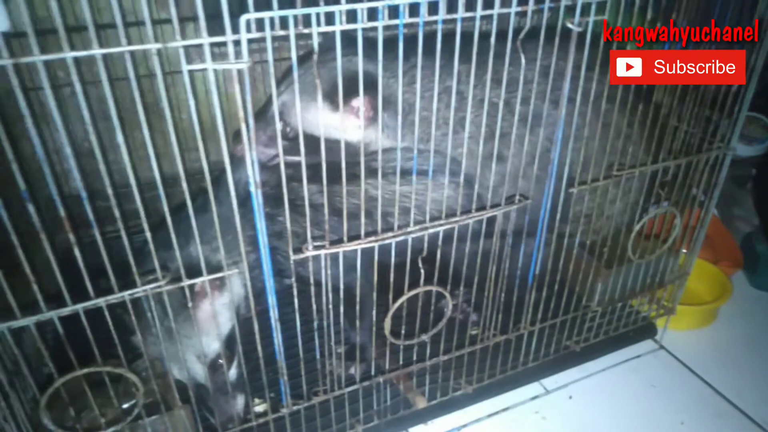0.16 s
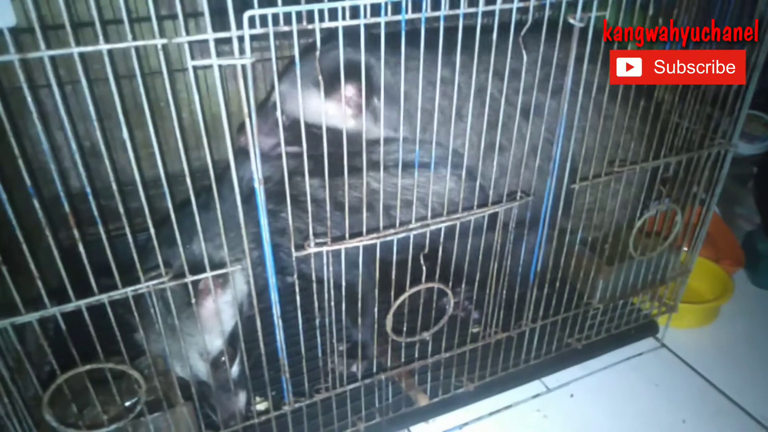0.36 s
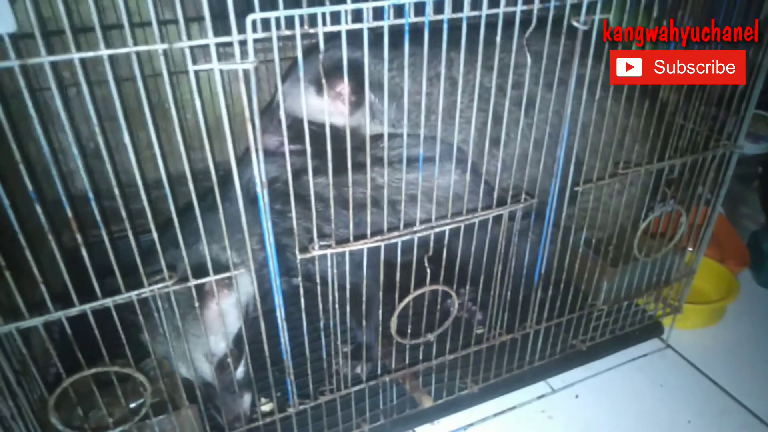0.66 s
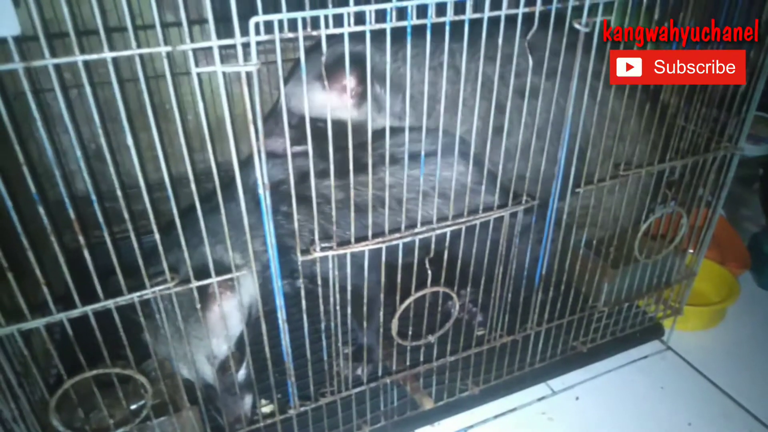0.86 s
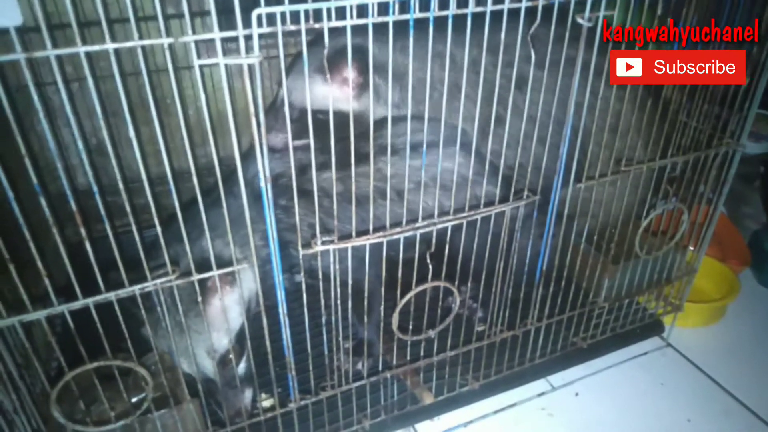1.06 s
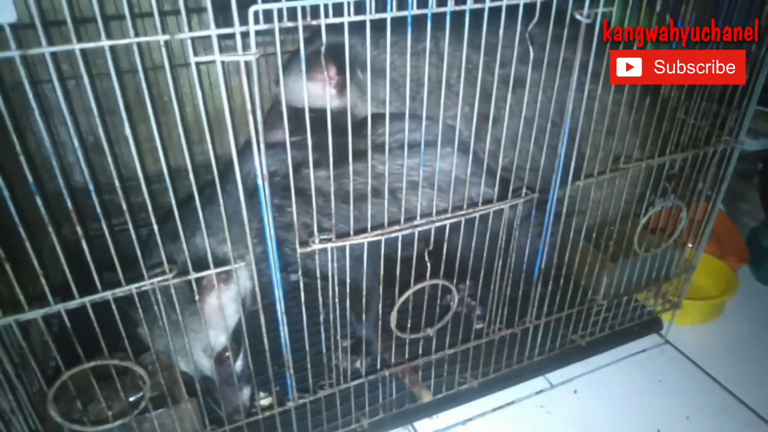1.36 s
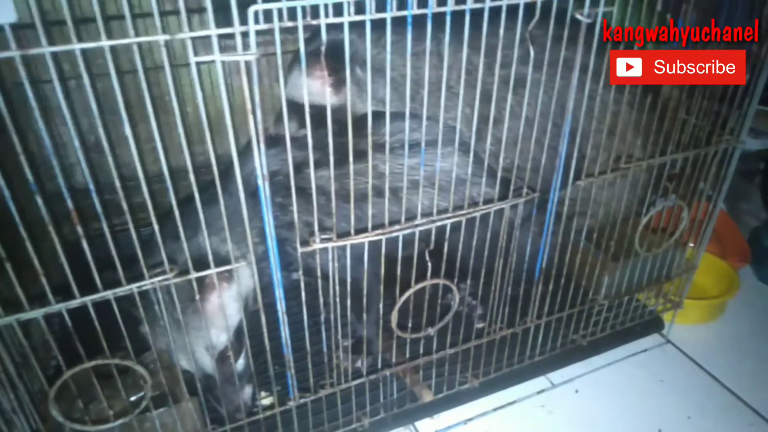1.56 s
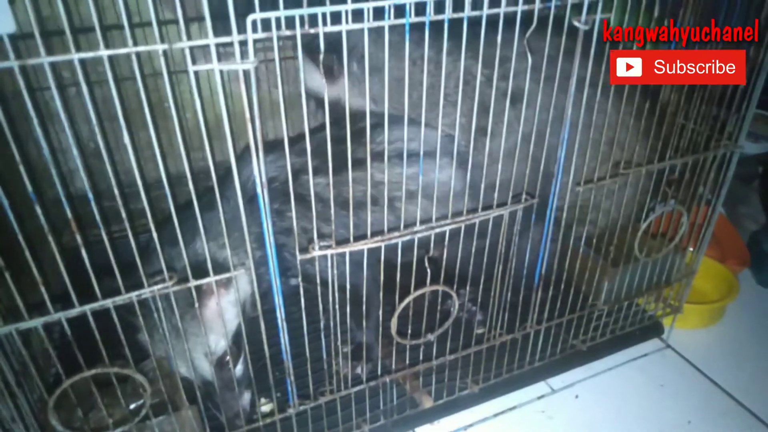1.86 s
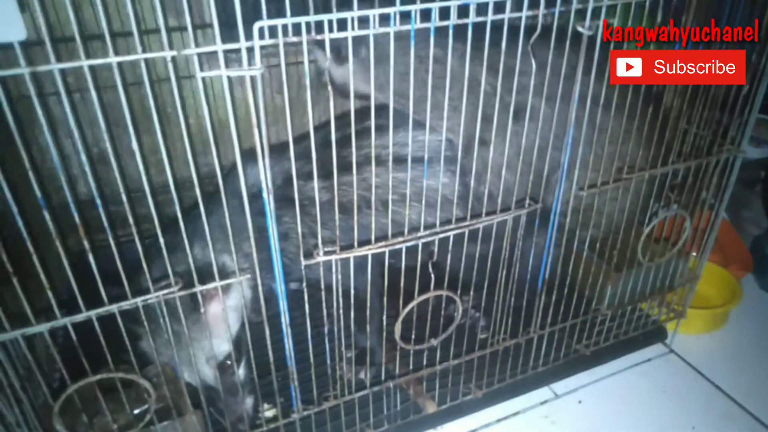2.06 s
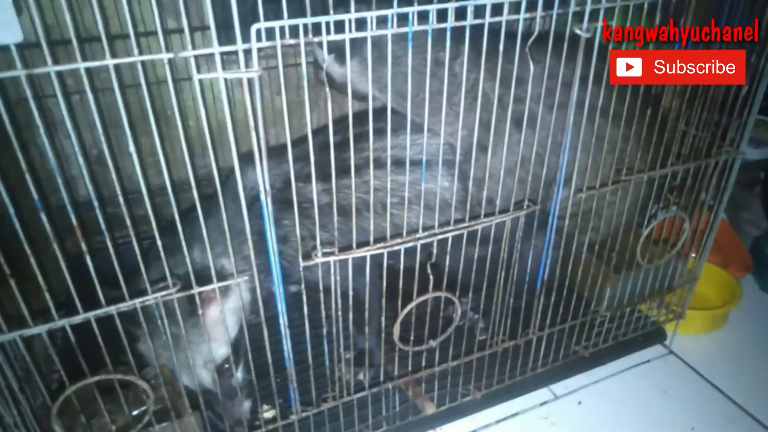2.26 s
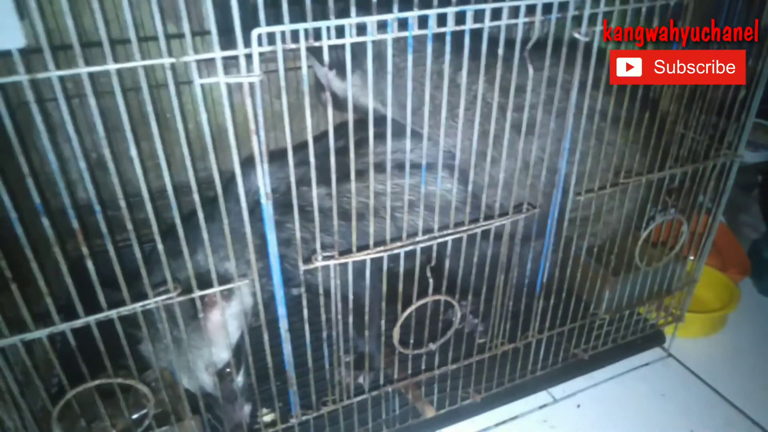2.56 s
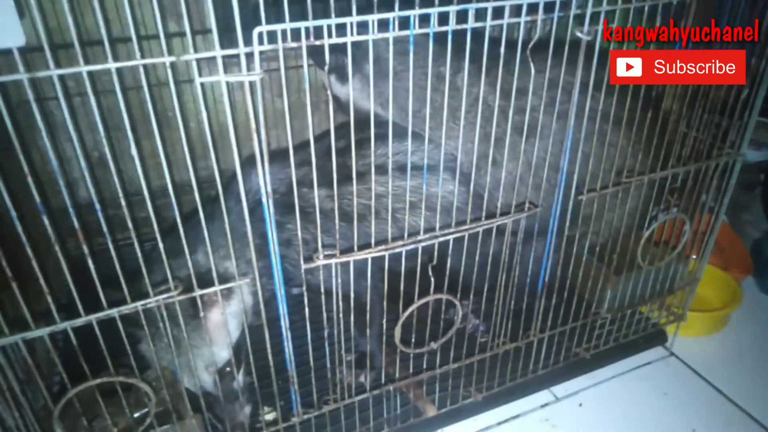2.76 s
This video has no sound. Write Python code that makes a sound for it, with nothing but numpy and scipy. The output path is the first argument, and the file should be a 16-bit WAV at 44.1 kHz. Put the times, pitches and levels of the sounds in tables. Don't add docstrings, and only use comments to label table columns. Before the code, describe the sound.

One long, shrill, whining animal call, opening with a quick yelp and wavering slightly, falls off into a tiny nasal sigh; short reflections from hard walls, quiet night air, low hum and distant insects.

```python
import sys
import numpy as np
from scipy import signal
from scipy.fft import rfft, irfft
from scipy.io import wavfile
from scipy.ndimage import uniform_filter1d

SR = 44100
rng = np.random.default_rng(int(sys.argv[2]) if len(sys.argv) > 2 else 0)


def boost_factor(decibels):
    exponent = np.asarray(decibels, float) / 20
    return 10 ** exponent


def generate_wav(sig):
    pcm = np.round(np.clip(np.atleast_2d(sig).T, -1, 1) * 32767).astype(np.int16)
    wavfile.write(sys.argv[1], SR, pcm)


N = 127890
TIME_S = np.arange(N) / SR


def evened(x):
    return x / np.sqrt(np.mean(x ** 2) + 1e-20)


def read(points, where):
    position, value = np.transpose(points)
    return np.interp(np.log(where + 0.0012), np.log(position), value)


def coloured(gain):
    spectrum = rfft(rng.standard_normal(N))
    return evened(irfft(spectrum * gain(np.fft.rfftfreq(N, 1 / SR)), N))


def peak(hz, width_hz):
    return lambda f: 1 / (1 + ((f - hz) / width_hz * 2) ** 2)


def bump(t, top_s, rise_s, fall_s):
    return np.exp(-((t - top_s) / np.where(t < top_s, rise_s, fall_s)) ** 2)


def insects():
    throb_hz, throb_top_s, throb_depth_db = 7.22, 0.055, 11
    swell = (np.cos(2 * np.pi * throb_hz * (TIME_S - throb_top_s)) - 1) / 2
    throb_db = throb_depth_db * swell + 1.2 * coloured(peak(0, 40))
    return boost_factor(-66 + throb_db) * coloured(peak(6600, 650))


# (pitch_hz, level_db)
AIR_COLOUR = [(25, -13), (50, -8.5), (110, -7.5), (330, -13), (1000, -7.5), (2200, -12.5), (5200, -32),
              (15000, -23.5)]


def still_air():
    return boost_factor(-65.5) * coloured(lambda f: boost_factor(read(AIR_COLOUR, f)) * (f > 20))


# (pitch_hz, level_db)
HUMS = [(51, -72), (100, -81), (187, -79)]


def hum():
    return sum(boost_factor(level_db) * coloured(peak(hz, 32)) for hz, level_db in HUMS)


# (time_s, pitch_hz, effort_db, mouth_open_0_to_1)
WAIL_LINE = [(0.052, 790, -44.5, 0), (0.081, 692, -43, 0.78), (0.128, 747, -49.5, 0.06),
             (0.216, 735.5, -32.5, 0), (0.301, 765, -31.5, 0.16), (.375, 737.3, -30.5, 0.43),
             (0.492, 780, -26.5, 1), (0.588, 794, -26.5, 0.94), (.68, 773.8, -24.5, 1),
             (0.842, 789, -24, 1), (1.139, 790.7, -24.5, 0.88), (1.31, 814.5, -27.5, 0.97),
             (1.601, 780.6, -24, 1), (1.968, 781.6, -24, 1), (2.299, 783.4, -23.5, 0.84),
             (2.499, 760.5, -25, 0.81), (2.6, 733.2, -23, 0.62), (2.625, 642, -34, 0.6)]
# (top_s, rise_hz, rise_s, fall_s, level_db)
CHEST_CATCHES = [
    (0.177, 74.5, 0.024, 0.032, -0.5),
    (0.437, 161.5, .03, 0.03, 2.5),
    (.75, 34.5, 0.032, .05, -3.5),
    (0.929, 8, 0.1, .02, 1.5),
    (1.029, 19, 0.017, 0.037, -2.5),
    (1.204, 32.5, .025, 0.016, -4),
    (1.987, -13.5, 0.005, 0.012, 0),
    (2.072, 17, .04, 0.051, 1.5),
    (2.162, 29.5, 0.056, 0.046, -2.5),
    (2.547, -3.5, 0.014, 0.017, -4),
]
# (time_s, length_s, level_db)
LOWEST_PARTIAL_DIPS = [
    (.38, .015, -18),
    (.705, .015, -14),
    (1.215, .025, -16),
    (1.7, .1, -4),
    (1.89, .04, -6),
    (2.0, .02, -14),
    (2.43, .03, -15),
]


def voice_line():
    times_s, *rows = np.transpose(WAIL_LINE)
    hz, effort_db, mouth = (uniform_filter1d(np.interp(TIME_S, times_s, row), size=600) for row in rows)
    for top_s, rise_hz, rise_s, fall_s, level_db in CHEST_CATCHES:
        shape = bump(TIME_S, top_s, rise_s, fall_s)
        hz = hz + rise_hz * shape
        effort_db = effort_db + level_db * shape
    return hz, effort_db, np.clip(mouth, 0, 1)


# (partial_number, level_db)
MOUTH_SHUT = [(1, -23.5), (2, 0), (3, -8.5), (4, -21), (5, -29), (6, -31.5), (7, -46.5), (8, -43), (9, -19),
              (10, -24.5), (11, -53.5), (12, -51.5), (13, -60), (14, -67.5), (15, -57), (16, -55),
              (17, -52.5), (18, -46.5), (19, -49.5), (20, -43)]
# (partial_number, level_db)
MOUTH_OPEN = [(1, -25.5), (2, -15), (3, 0), (4, -18.5), (5, -45.5), (6, -49), (7, -43), (8, -37.5),
              (9, -28), (10, -43.5), (11, -42.5),
              (12, -62), (13, -68), (14, -69), (15, -65), (16, -70), (17, -68), (18, -50), (19, -51),
                  (20, -60)]
# (partial_number, level_db per 30 Hz of pitch)
STRAIN_COLOUR = [(1, 9.5), (3, 1), (4, 1.5), (5, 30.5), (6, 27.5), (7, 6.5), (9, 8.5), (11, 9.5), (13, 2.5),
                 (17, 8.5)]
# (partial_number, level_db)
SOFT_COLOUR = [(1, 10), (2, -0.5), (3, -4), (4, -8.5), (5, -7), (9, -15), (20, -14)]
# (partial_number, level_db)
CLOSING_COLOUR = [(1, -5.5), (2, -15), (3, -3.5), (4, -16.5), (6, -6), (9, -2), (20, -9.5)]
# (partial_number, level_db)
YELP_COLOUR = [(1, 6), (2, -5), (3, -3), (4, 3), (6, -1), (12, -4)]


def partials(hz, mouth, shaken):
    strain = mouth ** 6 * np.clip((hz - 789.7) / 30, 0, 1)
    soft = np.clip((0.19 - TIME_S) / 0.013, 0, 1)
    closing = np.interp(TIME_S, [2.44, 2.6], [0, 1])
    dip_db = sum(db * bump(TIME_S, top_s, length_s, length_s) for top_s, length_s, db in LOWEST_PARTIAL_DIPS)

    wander = 0.0024 * coloured(peak(0, 34))
    jitter = (0.001 + 0.009 * shaken) * coloured(peak(0, 200))
    hz = hz * (1 + wander + jitter)
    yelp = np.clip((hz - 800) / 70, 0, 1)
    turn = 2 * np.pi * np.cumsum(hz) / SR

    follow = 0.7
    shut_shift = (hz / 781) ** (1 - follow)
    open_shift = (hz / 780) ** (1 - follow)
    tone = np.zeros(N)
    for k in range(1, 21):
        level_db = (1 - mouth) * read(MOUTH_SHUT, k * shut_shift)
        level_db += mouth * read(MOUTH_OPEN, k * open_shift)
        level_db += read(STRAIN_COLOUR, k) * strain + read(YELP_COLOUR, k) * yelp
        level_db += read(SOFT_COLOUR, k) * soft + read(CLOSING_COLOUR, k) * closing
        level_db += (k == 1) * dip_db
        shimmer_db = 0.72 + 2.2 * (1 - mouth) + 2.1 * (k >= 4)
        level_db += shimmer_db * coloured(peak(0, 22))
        level_db += 5 * shaken * coloured(peak(0, 96))
        wave = np.cos(k * turn + 2 * np.pi * rng.random())
        tone += np.sqrt(2) * boost_factor(level_db) * wave * (k * hz < 15700)
    return tone


# (pitch_hz, width_hz, level_db)
BREATH_BANDS = [(2083, 350, -36.5), (7450, 3100, -40.5), (14400, 3200, -58), (1100, 940, -56),
                (4970, 6000, -54), (10800, 1200, -70)]


def breath():
    air = np.zeros(N)
    for hz, width_hz, level_db in BREATH_BANDS:
        band = coloured(lambda f: peak(hz, width_hz)(f) ** 2)
        air += boost_factor(level_db + 2.5 * coloured(peak(0, 30))) * band
    return air


def wail():
    start_s, attack_s, release_s = 0.051, 0.0045, 0.013
    hz, effort_db, mouth = voice_line()
    glide_hz_per_s = uniform_filter1d(abs(np.gradient(hz)) * SR, size=1300)
    shaken = np.clip(glide_hz_per_s / 4600, 0, 1) ** 3
    voice = partials(hz, mouth, shaken) + breath() * boost_factor(7 * shaken)
    fade_in = np.clip((TIME_S - start_s) / attack_s, 0, 1)
    fade_out = np.clip((WAIL_LINE[-1][0] + release_s - TIME_S) / release_s, 0, 1)
    crack = boost_factor(-57) * bump(TIME_S, start_s + 0.0018, 0.0054, 0.007) * coloured(peak(1300, 1400))
    return fade_in * fade_out * boost_factor(effort_db) * voice + crack


# (pitch_hz, level_db)
HISS_COLOUR = [(2500, -22), (3500, 0), (6000, -1), (8500, -5), (10500, -13), (15000, -14)]


def hiss():
    air = coloured(lambda f: boost_factor(read(HISS_COLOUR, f)) * (f > 2000))
    return boost_factor(-55) * bump(TIME_S, 0.93, 0.01, 0.032) * air


def sigh():
    start_s, length_s, pitch_hz, fade_db_per_s = 2.608, 0.115, 665, -150
    t = TIME_S - start_s
    gate = np.clip(t / 0.012, 0, 1) * np.clip((length_s - t) / 0.02, 0, 1)
    hz = pitch_hz * (1 + 0.03 * np.exp(-abs(t) / 0.03) * coloured(peak(0, 120)))
    level_db = -45 + fade_db_per_s * np.maximum(t, 0) + 2 * coloured(peak(0, 66))
    return gate * boost_factor(level_db) * np.sin(2 * np.pi * np.cumsum(hz) / SR)


def peep():
    return boost_factor(-68.5) * bump(TIME_S, 2.8, 0.03, 0.03) * np.sin(2 * np.pi * 1152 * TIME_S)


# (pitch_hz, decay_s)
WALL_DECAY = [(500, .2), (1500, .25), (3000, .26), (7000, .11), (14000, .08)]
# (pitch_hz, level_db)
WALL_TINT = [(600, -11), (1600, -2.5), (2300, -8), (3500, 3), (8000, 3)]
# (delay_s, level_db)
FIRST_ECHOES = [(.0021, -16), (.0047, -20.5), (.0083, -18.5), (.0126, -31), (.019, -15.5), (.057, -30.5)]


def walls(x):
    taps = np.zeros(SR // 2)
    at = np.arange(400, len(taps) - 20, 20)
    taps[at + rng.integers(0, 20, len(at))] = rng.choice([-1., 1.], len(at))
    hz, t, bands = signal.stft(taps, SR, nperseg=256)
    fade_db = read(WALL_TINT, hz)[:, None] - 60 * t / read(WALL_DECAY, hz)[:, None]
    tail = signal.istft(bands * boost_factor(fade_db), SR, nperseg=256)[1]
    tail = boost_factor(-9.5) * tail / np.linalg.norm(tail)
    tail[0] = 1
    for k, (delay_s, level_db) in enumerate(FIRST_ECHOES):
        tail[round(delay_s * SR)] += (-1) ** k * boost_factor(level_db)
    return signal.fftconvolve(x, tail)[:N]


def scene():
    night = insects() + still_air() + hum() + peep()
    animal = walls(wail() + hiss() + sigh())
    return (night + animal)[None]


def roll_off(x):
    return signal.sosfilt(signal.butter(12, 15660, fs=SR, output="sos"), x)


def record(dry):
    return roll_off(dry)


dry = scene()
out = record(dry)
generate_wav(out)
```